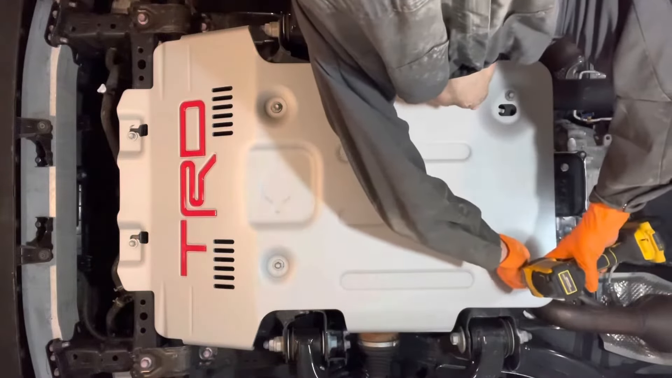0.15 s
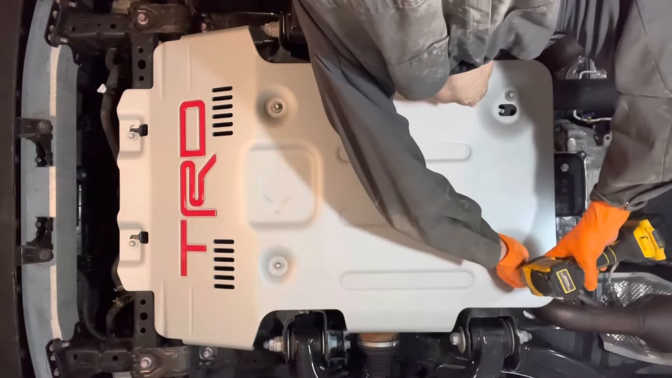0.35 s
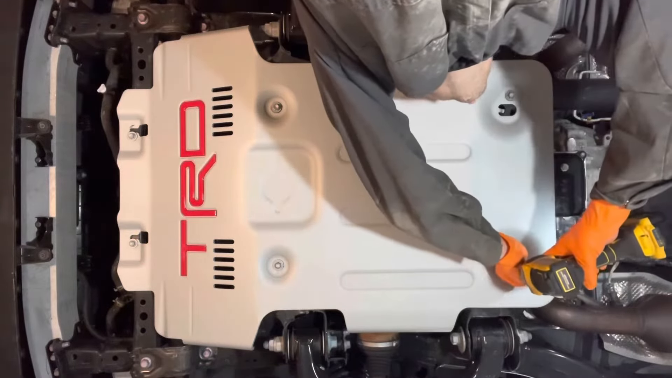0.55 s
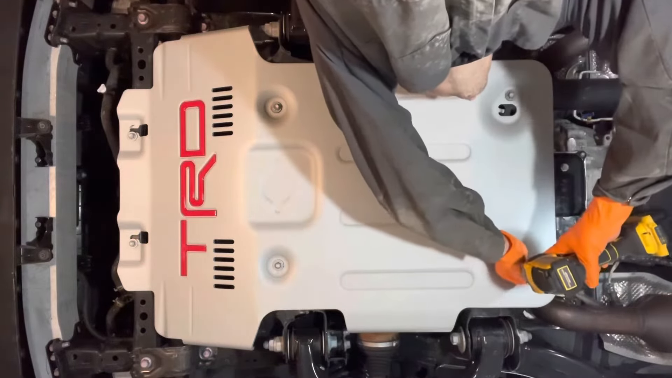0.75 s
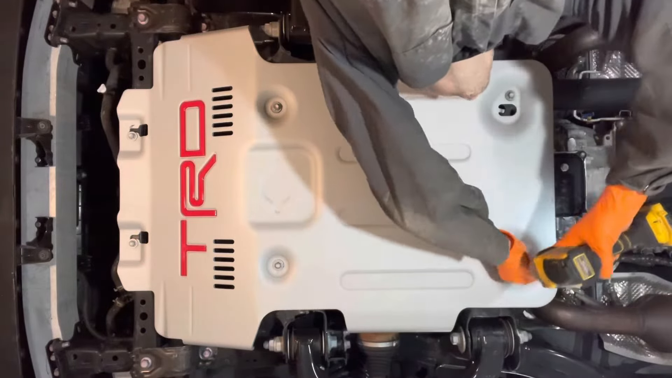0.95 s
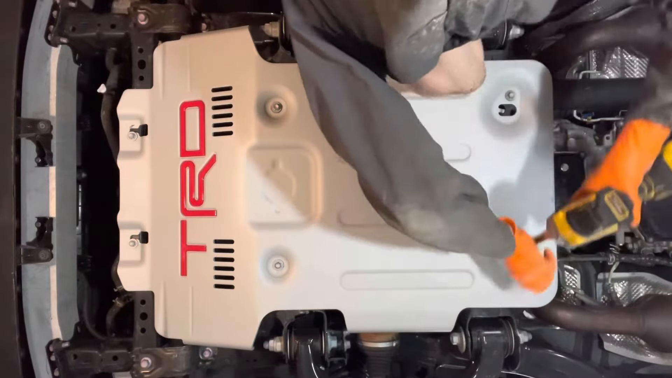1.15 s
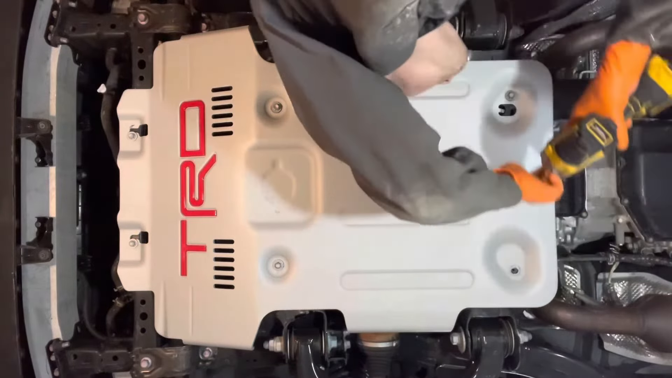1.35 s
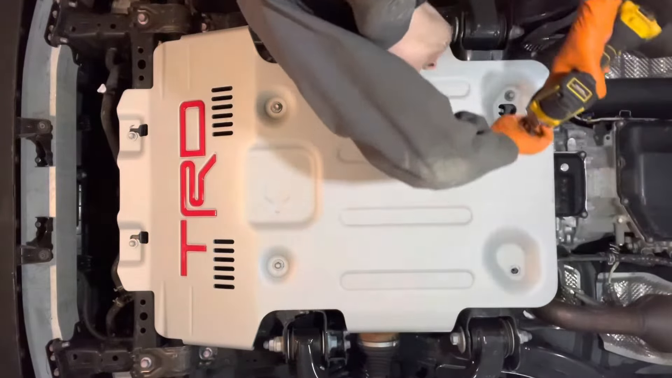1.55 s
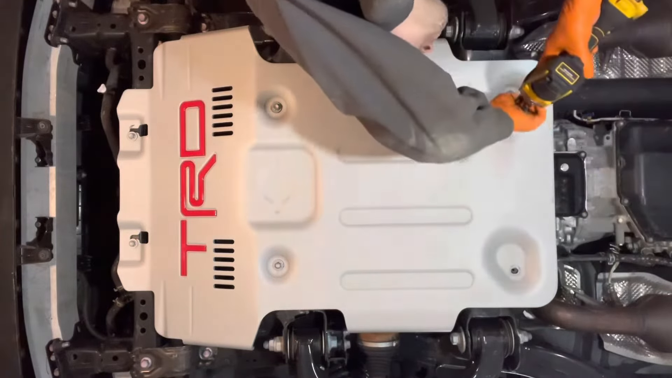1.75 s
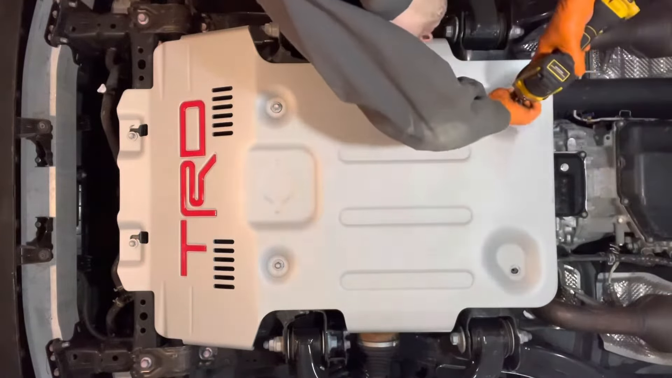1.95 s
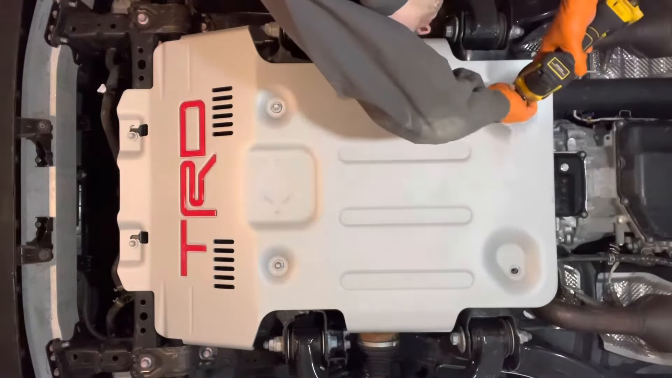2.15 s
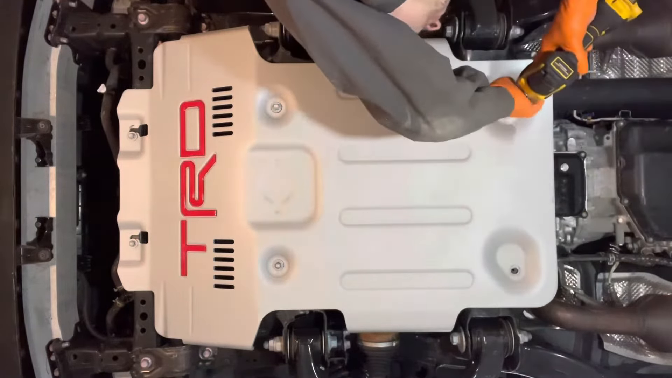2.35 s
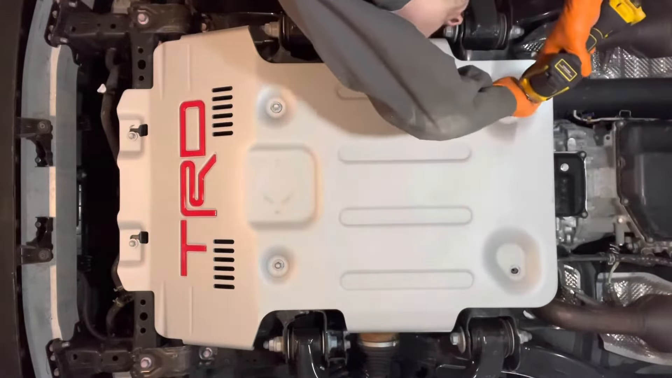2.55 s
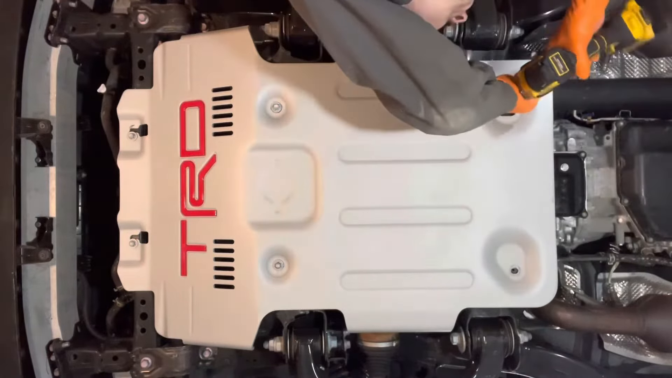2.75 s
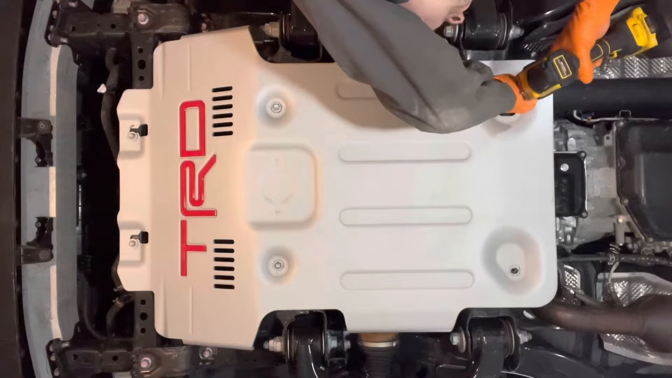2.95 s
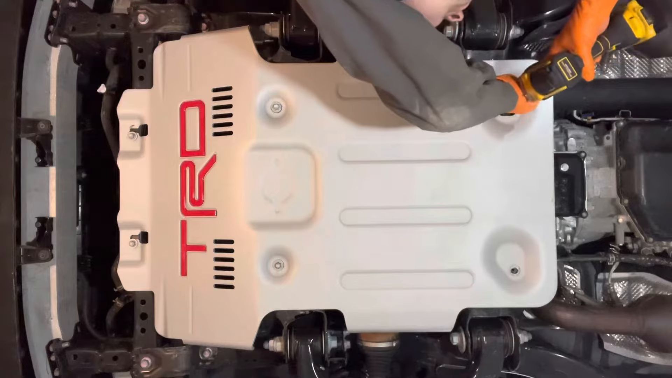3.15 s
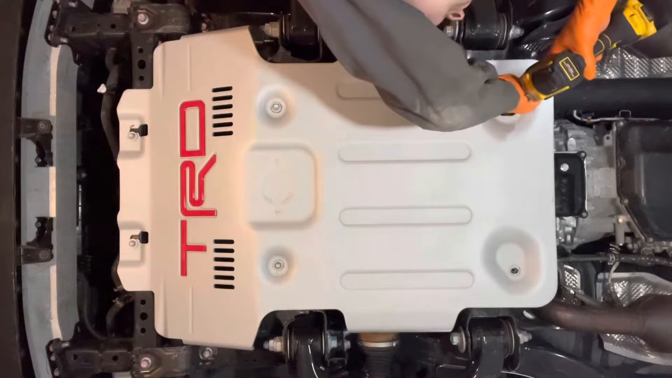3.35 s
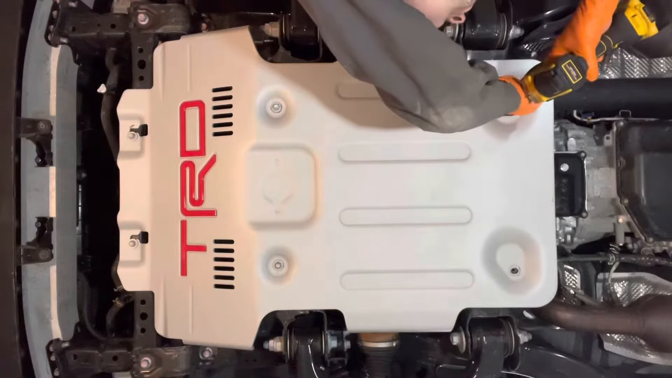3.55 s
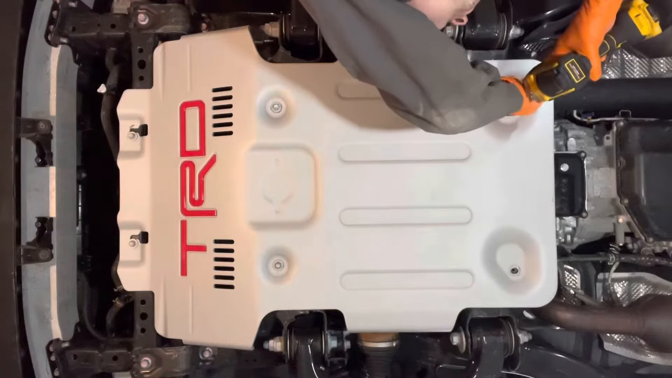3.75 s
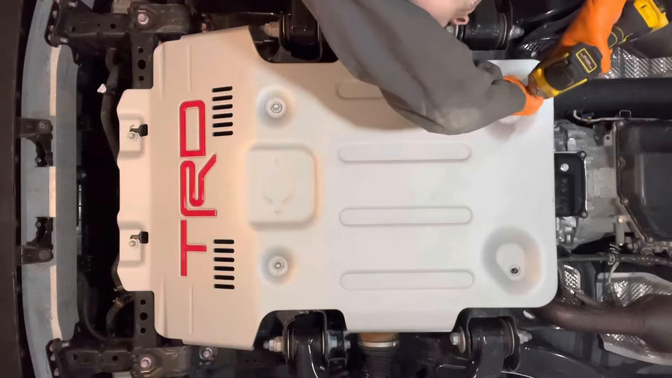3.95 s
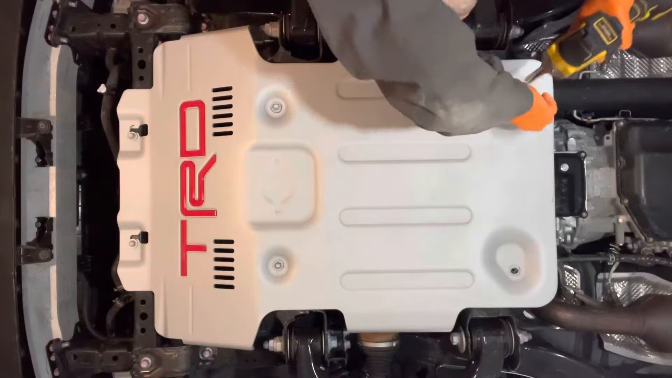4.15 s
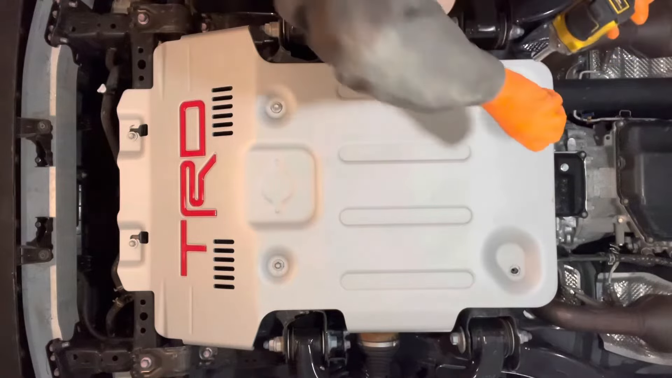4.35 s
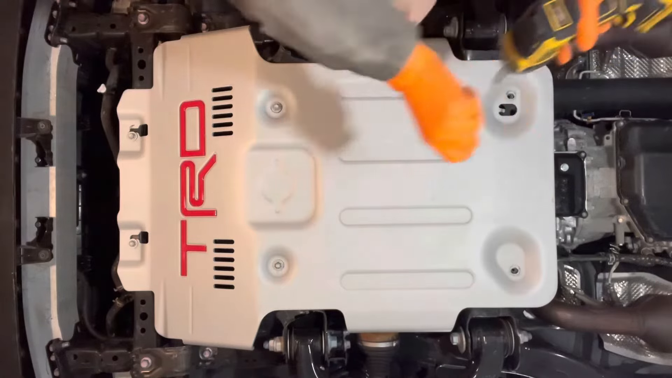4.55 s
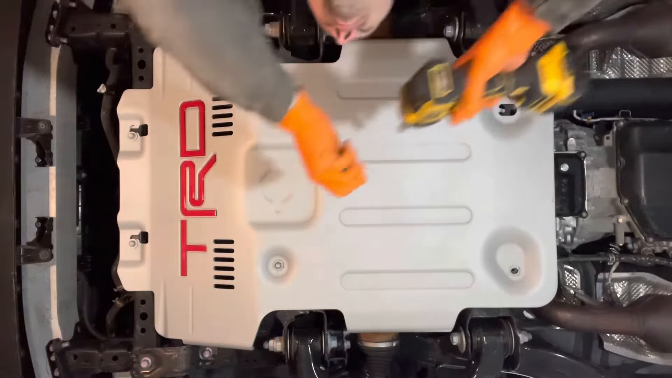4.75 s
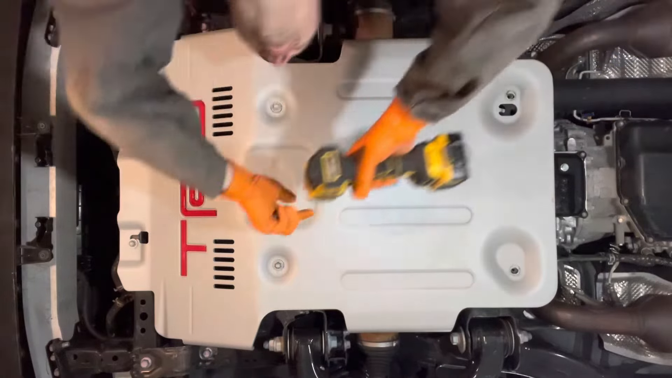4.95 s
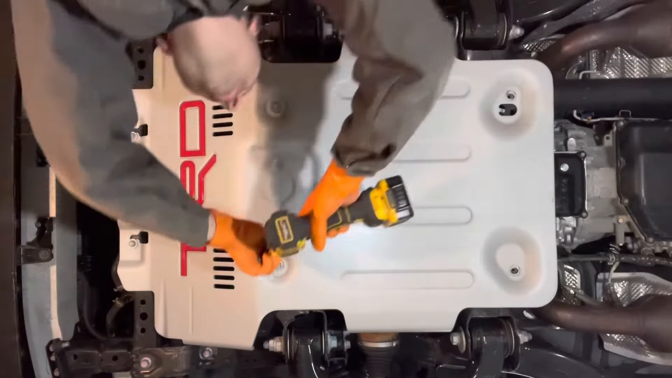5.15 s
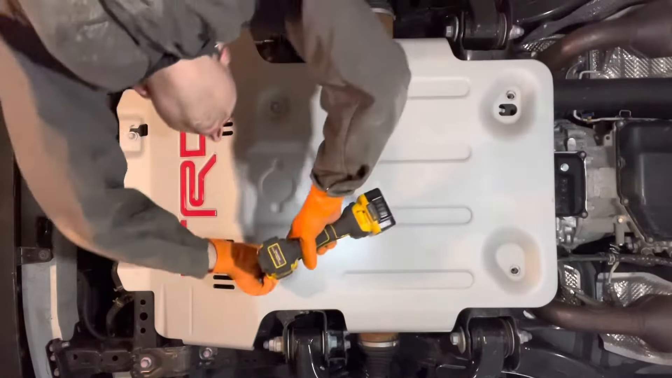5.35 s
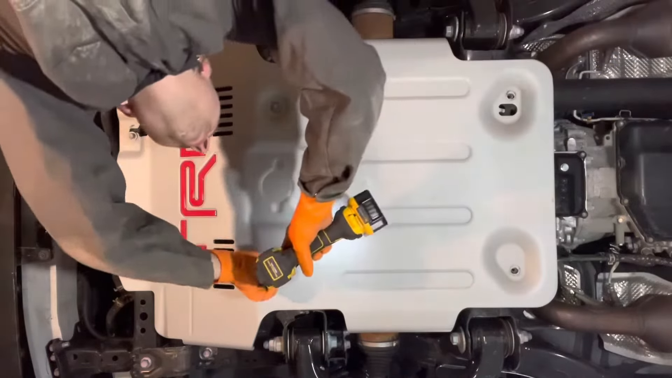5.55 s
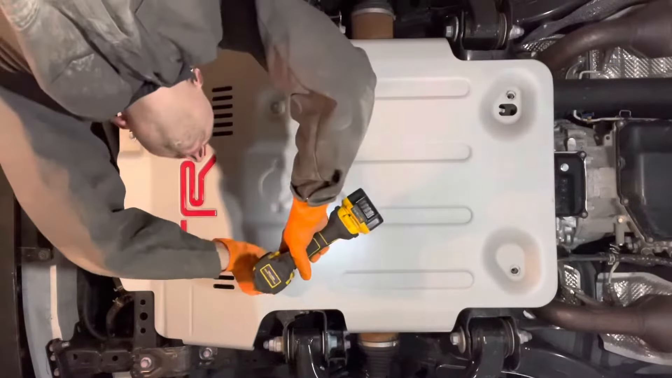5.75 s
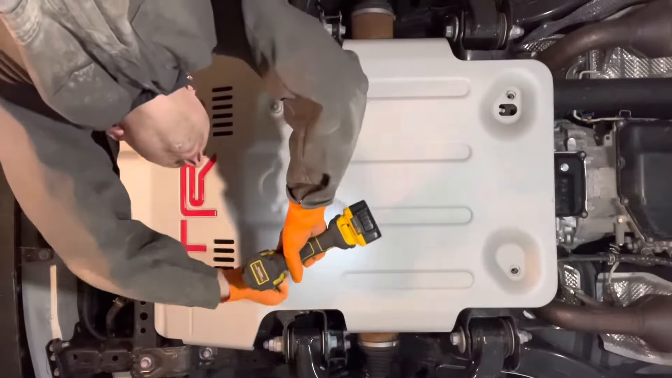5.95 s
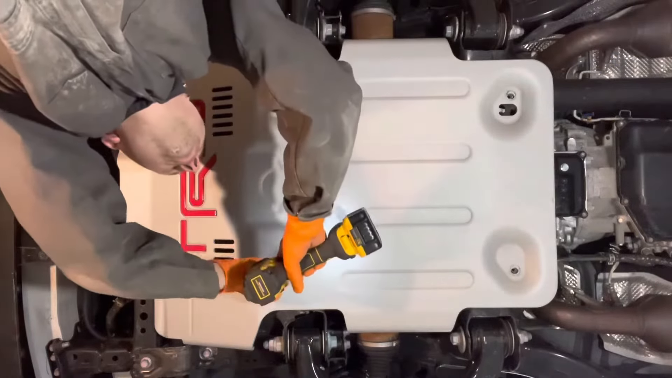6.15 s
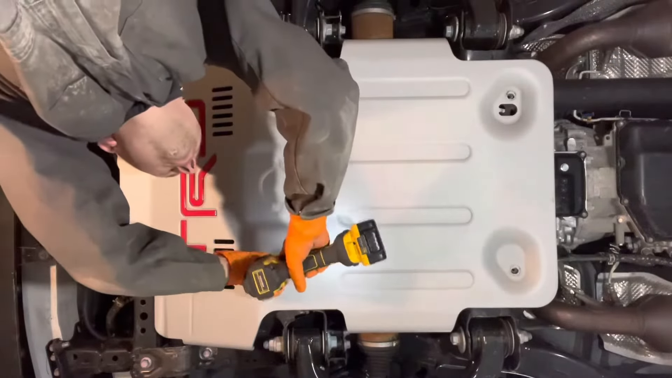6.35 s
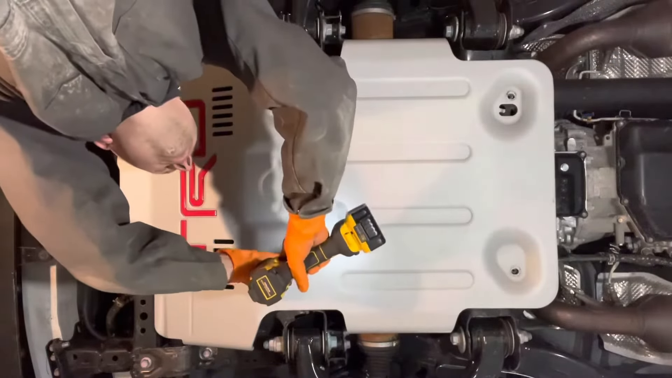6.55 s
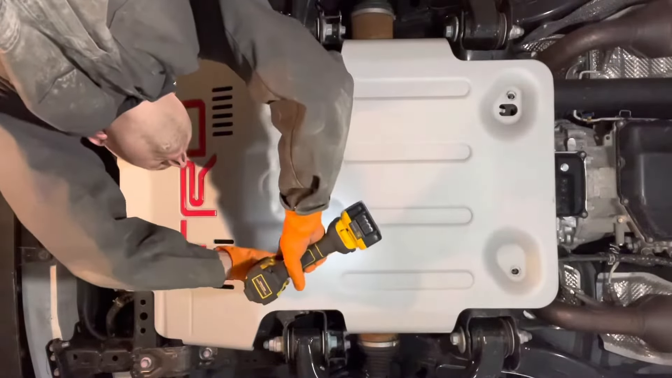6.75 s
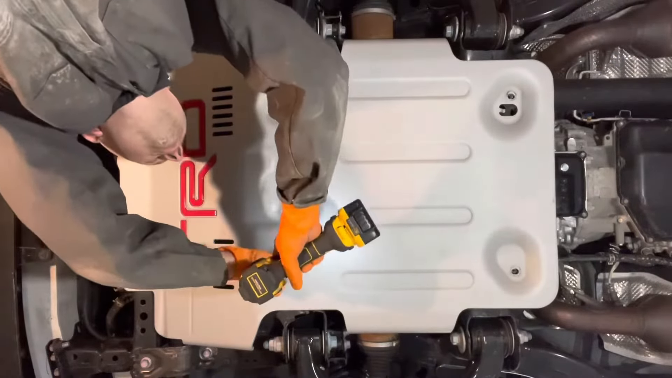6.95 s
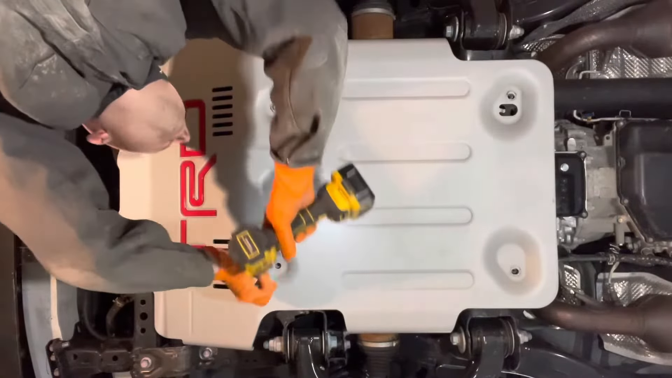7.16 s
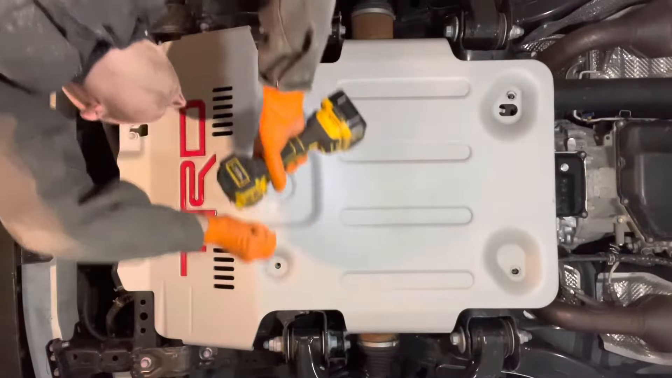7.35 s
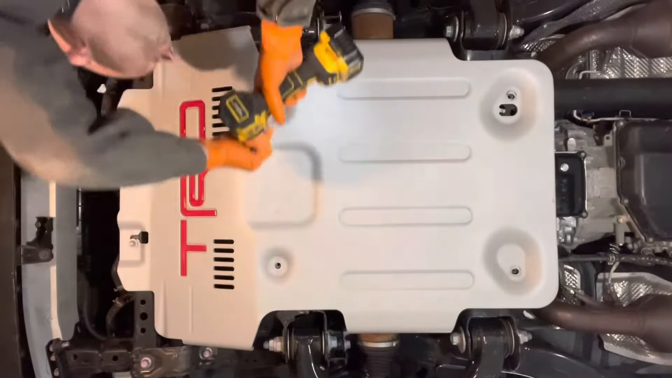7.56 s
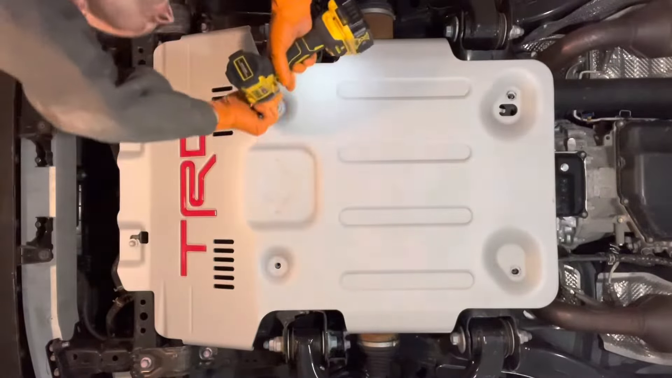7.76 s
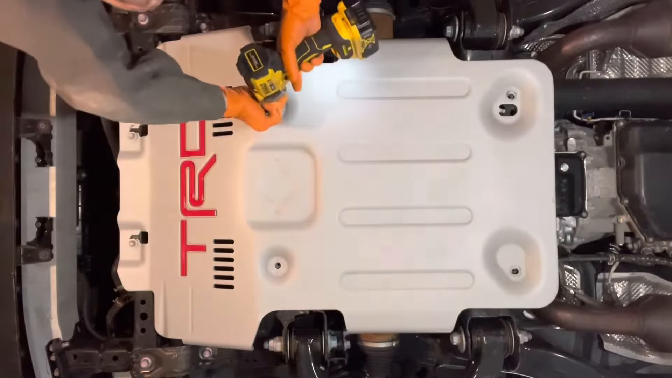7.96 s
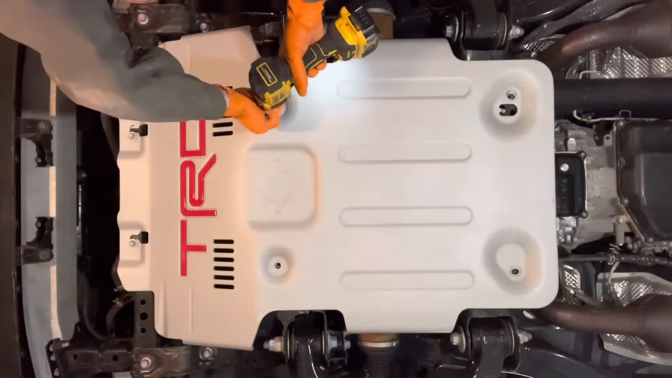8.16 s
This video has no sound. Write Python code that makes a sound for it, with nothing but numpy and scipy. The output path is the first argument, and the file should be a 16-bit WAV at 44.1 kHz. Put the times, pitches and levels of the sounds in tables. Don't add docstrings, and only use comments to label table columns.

```python
import sys
import numpy as np
from scipy import signal
from scipy.fft import rfft, irfft, next_fast_len
from scipy.io import wavfile
from scipy.ndimage import uniform_filter1d, map_coordinates

SR = 44100
rng = np.random.default_rng(int(sys.argv[2]) if len(sys.argv) > 2 else 0)


def magnitude_from_level(level_db):
    exponent = np.asarray(level_db, float) / 20
    return 10 ** exponent


def waveform_to_disk(signal):
    frames = np.transpose(np.atleast_2d(signal))
    scaled = np.clip(frames, -1, 1) * 32767
    samples = np.round(scaled).astype(np.int16)
    wavfile.write(sys.argv[1], SR, samples)


N = 361619
T = np.arange(N) / SR

# (time [s], gear mesh [Hz], load [dB], bite of the teeth [dB])
BURSTS = [
    [(0, 730, -33, -9), (.2, 775, -28.5, -6), (.315, 812, -29, -3), (.345, 970, -28.5, 4),
     (.39, 1003, -28, -4), (.43, 1130, -29.5, -3), (.49, 1169, -30.5, -2.5), (.72, 1182, -29.5, -0.5),
     (.8, 1152, -32, -11)],
    [(2.93, 270, -53, -1), (3.06, 342.7, -35, 6.5), (3.1, 436.8, -30.5, 4), (3.16, 435.7, -31.5, 1.5),
     (3.21, 520.7, -32.5, 3.5), (3.3, 640.5, -33.5, 1), (3.37, 711, -35.5, 1), (3.6, 729, -34, 3.5),
     (3.875, 735, -37.5, -10)],
    [(6.4, 979, -35.5, -11), (6.51, 995, -41.5, 0), (6.62, 1030, -30.5, -12.5), (6.7, 1035, -29.5, -3),
     (6.81, 1059, -33, 2.5), (6.83, 1120, -29.5, 5.5), (6.87, 1169, -34, 8.5), (6.945, 1140, -35.5, -15)],
]
# (frequency [Hz], width [Hz], level [dB])
HOUSINGS = [
    [(755, 1100, -3), (1550, 97, 1.5), (1063, 250, 8.5), (2060, 240, 1), (2214, 295, 8.5), (3050, 240, -26),
     (4100, 280, -2.5), (4710, 240, -5), (6550, 330, -6), (9340, 470, -16), (13600, 900, -10)],
    [(846, 180, -10), (1420, 340, -8), (2160, 340, -3.5), (2900, 61, -2.5), (4030, 570, -4.5),
     (5140, 280, -8), (6600, 320, -4.5), (9200, 1400, -15.5), (11500, 630, -17), (13220, 1000, -9.5)],
    [(814, 100, 2), (1020, 130, 4), (1540, 100, 0.5), (2080, 320, 4), (2750, 270, -2), (4090, 290, -1.5),
     (6670, 1000, -7), (9300, 1300, -9), (11800, 840, -15), (13240, 800, -9.5)],
]
# (level of each mesh order [dB], .., fan at top speed [dB])
VOICES = [
    (-8.5, -1.8, -6, -21, -27, -37, -3.5),
    (-15.5, -1.5, -8, -24.5, -32, -22.5, -5),
    (-14.5, -0.81, -26, -20.5, -32, -29, -4),
]
# (frequency [Hz], waver [Hz], level over load [dB])
SINGING = [
    [(4035, 111.4, -10), (6490, 59, -16), (2910, 49.7, -18), (4760, 115, -19)],
    [(4070, 49, -27), (6530, 130, -15), (6780, 110, -13.5), (2045, 45, -19), (2230, 130, -9),
     (2900, 39, -18)],
    [(3950, 73, -25), (6370, 33, -19.5), (7050, 90, -17.5), (2470, 40, -17)],
]
SING_DB_PER_OCTAVE = 53, 34, 22
MESH_ORDERS = 1, 2, 3, 4, 5, 7
ORDER_WAVER_DB = 4.5, 2, 3.5, 3.6, 3.6, 3.6
FAN_DB_PER_OCTAVE, TONES_IN_HOUSING = 7.5, 0.49
TONES_TOP_HZ, TONES_IN_ROOM_DB = 2760, -9.5
FLUTTER_DB, GLIDE_LOSS_DB = 2.5, 0.35
COAST_DB, COAST_T60 = -14, 0.52
BOLT_MODES_DB = 2.2

# (frequency [Hz], density [dB/Hz])
RUMBLE = [(20, -15), (45, -1.5), (70, 2), (120, -6.5), (250, -42)]
# (time [s], level [dB], width [s])
BUMPS = [
    (.22, 12.5, 0.23),
    (2.25, 7.5, 0.18),
    (2.85, 5.5, .1),
    (3.2, 5, 0.16),
    (4.86, 12.5, .06),
    (5.62, 4, .12),
    (8.05, 4.5, .2),
]
# (frequency [Hz], width [Hz], level [dB])
PLATE_LOW = [
    [(81.6, 7.4, -13), (112, 19, -9.5), (128.05, 4, 4)],
    [(176.5, 26, -2.5), (254, 10, -1.5), (298.2, 14, -2), (370, 21, -6.5)],
]
# (time [s], lowest modes [dB], rise [s], fall [s], next modes over them [dB])
SHAKES = [(.09, -40.5, 0.32, 0.41, 5.5), (.66, -36.5, 0.58, 0.29, 3), (1.3, -63.5, 1.4, 0.98, 1.5),
          (2.12, -42, 0.17, 0.24, 7), (2.811, -28.5, 0.031, 0.17, 6), (3.26, -37.5, 0.65, 0.11, 0),
          (3.36, -40, 0.34, 0.44, -8.5), (4.3, -70.5, 1.4, 2.6, 2.5), (4.932, -59, 0.12, 0.62, 6.5),
          (5.53, -49, 0.05, 0.52, 6), (6.299, -32, 0.029, 0.1, 3.5), (6.601, -24.5, 0.25, 0.16, -7),
          (6.759, -22.5, 0.33, 0.28, -14.5), (7.33, -48, 1.4, 2.5, -18)]
STILL_DB, NEXT_QUICKER = (-79, -73.5), 1.216

# (time [s], peak [dB], low part [dB])
TICKS = [(0.789, -37, -7), (1.048, -41, -12), (1.1453, -28.5, -32), (2.4782, -53, 0), (3.8601, -23, -22),
         (4.35, -26.5, -30), (4.543, -44, -6), (4.7224, -43, -25.5), (7.503, -32, -26), (7.66, -43.5, -16),
         (1.315, -60.5, 24), (5.014, -53, 10.5), (5.341, -48.5, -22)]
# (time [s], level [dB], rise [s], fall [s], brightness [dB])
MOVES = [(1.044, -55.5, 0.12, 1, -5), (1.6, -62, 1.3, 1, -32), (1.82, -66.5, 0.65, 0.093, -3.5),
         (2.48, -65, 0.028, 0.26, 1), (4.72, -70.5, 0.026, 0.059, 8.5), (2.25, -60, 0.095, 1, -14),
         (4.05, -63, 0.56, 0.83, -11.5), (4.374, -58.5, 0.33, 0.51, -6), (5.02, -53.5, 0.43, 0.3, -7.5),
         (5.25, -56, 0.14, 0.99, -13.5), (5.43, -66, 0.071, 0.26, 12.5), (5.88, -58.5, 0.18, 0.5, -3.5),
         (6.1, -64, 1.7, 0.88, -11), (7.1, -62, 0.15, 0.56, -23), (7.216, -47.5, 0.037, 0.22, 1.5),
         (7.31, -43, 0.126, 0.16, 1.5), (7.55, -59, 0.31, 0.33, -7)]
# (frequency [Hz], density [dB/Hz])
CLOTH = [(300, -5.5), (600, -10.5), (1500, -14), (3500, -20.5), (6000, -29), (10000, -30.5), (14000, -32),
         (16000, -38)]
HUSH_DB, MID_SHARE, MID_DB = (-79, -82, -85), 0.71, -2

# (time [s], peak [dB], thud [dB], crack [dB], hardness [dB/octave])
BLOWS = [(1.951, -12.5, -18.5, -48, -2), (2.039, -39, -7.5, -17, 10), (2.638, -34.5, -1.5, -29, -9.5),
         (2.735, -26.5, -20, -31, -3), (2.761, -19, -29, -34, -3), (2.773, -26, -29, -17, 7.5),
         (2.843, -20, -21, -20, 12.5), (2.85, -14, -21, -2.5, 6.5), (2.862, -19.5, -20.5, -4, 5.5),
         (3.886, -31.5, -24, -29, 3), (5.513, -10.5, -23.5, -30, 3), (5.527, -15, -20.5, -35.5, 0),
         (5.62, -33, -26, -32, 1.5), (5.574, -23.5, -29.5, -21.5, 8.5), (5.589, -18.5, -18.5, -28.5, -5.5),
         (5.687, -30, -36.5, -12.5, 4), (5.881, -41, -3.5, -24.5, 4), (5.943, -33, -16.5, -27, 6),
         (5.953, -26.5, -12, -30, -0.5), (5.963, -25.5, -16, -36.5, -5), (6.231, -30, -26, -21, 2.5),
         (6.249, -13.5, -5, -13.5, -0.5), (6.276, -15, -9.5, -29.5, 3.5), (6.288, -3, -11.5, -31, -1),
         (6.300, -11.5, -9.5, -32, -3.5), (6.312, -4, -24.5, -10.5, -5.5), (6.321, -9, -10.5, -20, 1),
         (6.343, -23.5, -15, -10.5, 5), (6.3669, -16.5, -35.5, -3, 7.5), (6.774, -44.5, -27, -10, 1),
         (6.923, -24, -30, -19, 3), (8.001, -14.5, -26.5, -50, 1.6), (8.014, -20.5, -27, -40, 2),
         (8.047, -28.5, -29, -34, 1), (8.075, -37, -33, -34, 2.5), (8.149, -23.5, -48, -10, 11.5),
         (8.155, -18, -51, -17.5, -2), (8.179, -21.5, -52, -29, 3)]
# (time [s], peak [dB], thud [dB], crack [dB], hardness [dB/octave])
KNOCKS = [
    (2.087, -17.5, -12, -51, -12.5),
    (2.801, -10.5, -29, -37, -15),
    (2.802, -11, -5, -38, 2.5),
    (2.807, -13, -14, -38.5, 2),
    (2.836, -17, -4.5, -33, -16),
    (6.262, -15.5, 5, -44, 2),
    (5.014, -57.5, 4, -27, -30),
    (7.304, -42.5, 10.5, -15.5, -15.5),
    (7.997, -17, -16, -39, -1),
]
# (frequency [Hz], level [dB], t60 [s])
PLATES = [
    [(707.4, -11, 0.64), (1083, -5.5, 0.092), (1280, -29, 0.17), (1765, -10.5, 0.047), (1911, -4, 1.1),
     (2040, -10, 0.19), (2380, -29, 0.054), (2840, -15.5, 0.22), (3480, -40, 0.49)],
    [(708, -2.5, 0.095), (593.4, -8, 0.064), (1014, -7, 0.29), (1166, -3, .13), (2367, -9.5, 0.27),
     (4360, -10.5, 0.06), (1572, -24, 0.039), (1770, -17.5, 0.24), (2097, -15.5, 0.054), (2890, -18, .2),
     (3730, -12.5, 0.028)],
    [(716, -9.5, 0.4), (985.6, -1.5, 0.22), (1066, -1.5, 0.16), (1557, -6, 0.23), (2173, -1.5, 0.14),
     (2470, -4.5, 0.071), (2790, -16.5, 0.18), (3430, -13, 0.23), (3200, -13, 0.058), (3890, -19, 0.11),
     (4420, -40, 0.1)],
    [(854, -6.5, 0.12), (1270, -4, 0.11), (1547, -8, .2), (1807, -8, .1), (1870, -6.5, 0.24),
     (2180, -6.5, 0.14), (2326, -8.5, .15), (3490, -11.5, 0.096), (3940, -10.5, 0.094), (4570, -20, 0.17)],
    [(729, -7.5, 0.16), (1040, -8, 0.22), (1140, 3, 0.16), (1550, -2, 0.2), (1236, -39, 0.25),
     (1778, -0.5, 0.12), (1830, -11, 0.2), (1930, 1, 0.15), (2620, -33, 0.45), (2900, -42, 5.0),
     (3630, -13.5, 0.18), (4260, -40, 0.21)],
]
# (frequency [Hz], density [dB/Hz])
SHEET = [(300, -44), (600, -3), (1100, 8), (2200, 1.5), (3500, -12.5), (5000, -19), (9000, -42)]
# (frequency [Hz], t60 [s])
SHEET_T60 = [(150, 0.26), (400, 0.29), (1000, 0.12), (3000, 0.26), (8000, 0.2)]
# (frequency [Hz], width [Hz], level [dB])
SOCKET = [(4370, 1400, 8), (8290, 840, 3.5), (11600, 1800, 0), (15500, 1500, -3.5)]
BLOW_CHATTER_S, KNOCK_CHATTER_S = 0.011, 0.0049
BLOW_ATTACK_S = 0.0014
LEAD_IN_S, LEAD_IN_DB, KNOCK_LEAD_IN_DB = 0.015, -16.5, -31
LONGEST_T60, SPLIT = 0.21, 0.012

# (time [s], groan [dB])
STRAIN = [
    (2.626, -57.5),
    (2.8, -24.5),
]
SQUEAK_DB, SQUEAK_GROWS = -40, 0.58
HISS_DB, HISS_GROWS = -56.5, 0.37
# (time [s], peak [dB])
SNAPS = [
    (2.8526, -9.5),
    (6.2485, -12.5),
    (6.3108, -3),
    (6.3682, -7.5),
]
# (frequency [Hz], width [Hz], level [dB])
ANVIL = [(4500, 900, -7), (8600, 1200, 1.5), (12700, 2900, -0.5), (16000, 1500, -4.5)]
LATE_RING = 3.5, 254.5, -60.5, 14.5
PLATE_HUM = 6, 181, -45, 1
# (frequency [Hz], level [dB], t60 [s])
AFTER_RING = [(51.3, -61, 7.8), (106, -34.5, 3.2), (130, -40.5, 6.1), (174, -48, 4.4), (376, -64, 3.06)]

# (frequency [Hz], t60 [s])
GARAGE = [(150, 0.87), (1000, 0.6), (4000, 0.53), (12000, 0.18)]
# (frequency [Hz], left-right likeness [0-1])
ALIKE = [(40, 0.78), (150, 1), (320, 0.71), (1000, 0.77), (2500, 0.94), (5000, 0.043), (7000, 0.51),
         (15000, 0.42)]
# (frequency [Hz], left lead [rad])
LEAD = [(120, 0.11), (1100, -1.49), (4100, -1.2), (6600, -0.036), (14000, 1)]
# (time [s], left over right [dB])
PAN = [
    (0, -1.5),
    (1.2, 1),
    (1.5, 0.5),
    (2.2, -0.5),
    (3, -1.6),
    (4.2, -0.5),
    (5.2, 2),
    (5.6, -1.3),
    (6.7, -0.5),
    (8.2, 0.5),
]


def unit(x):
    return x / np.sqrt(np.mean(x ** 2) + 1e-20)


def along(points, hz):
    f, v = np.transpose(points)
    return np.interp(np.log(hz + 1), np.log(f + 1), v)


def curves(rows):
    s, *cols = np.transpose(rows)
    return [np.interp(T, s, c) for c in cols]


def gate(rows, fade):
    opening = np.clip((T - rows[0][0]) / fade + 1, 0, 1)
    closing = np.clip((rows[-1][0] - T) / fade + 1, 0, 1)
    return opening * closing


def wobble(rate):
    t = T[::16]
    knots = rng.standard_normal(int(N * rate / SR) + 4)
    return np.interp(T, t, map_coordinates(knots, [t * rate]))


def filtered(x, response):
    n = x.shape[-1]
    m = next_fast_len(n + 8192)
    return irfft(rfft(x, m) * response(np.fft.rfftfreq(m, 1 / SR)), m)[..., :n]


def band(f, lo_hz, hi_hz):
    return 1 / np.sqrt((1 + (lo_hz / (f + 1)) ** 8) * (1 + (f / hi_hz) ** 8))


def resonances(peaks, f):
    return np.sqrt(sum(magnitude_from_level(2 * db) / (1 + ((f * f - c * c) / (f * w + 1)) ** 2) for c, w, db in peaks))


def dying(t60s, seconds):
    hz, t, z = signal.stft(rng.standard_normal((2, int(seconds * SR))), SR, nperseg=256)
    return signal.istft(z * magnitude_from_level(-60 * t / along(t60s, hz)[:, None]), SR, nperseg=256)[1]


def patchy(patchy_db):
    z = signal.stft(rng.standard_normal((2, N)), nperseg=512)[2]
    field = uniform_filter1d(rng.standard_normal(z.shape[1:]), size=3, axis=0)
    field = uniform_filter1d(field, size=8, axis=1)
    return signal.istft(z * magnitude_from_level(patchy_db * unit(field)), nperseg=512)[1][:, :N]


def crowded(depth_db, spacing_hz):
    knots = rng.standard_normal((2, int(SR / 2 / spacing_hz) + 4))

    def response(f):
        peaks = np.array([map_coordinates(k, [f / spacing_hz]) for k in knots])
        return magnitude_from_level(depth_db * peaks - depth_db ** 2 / 9)
    return response


def swells(rows, over_db, quicker, rest_db):
    t = T[::64]
    power = magnitude_from_level(2 * rest_db)
    for (s, db, rise, fall, _), more_db in zip(rows, over_db):
        away = np.where(t < s, (s - t) / max(rise, .01), (t - s) / max(fall, .01))
        power = power + magnitude_from_level(2 * (db + more_db - 20 * quicker * away))
    return np.interp(T, t, np.sqrt(power))


def ports(pair):
    def mid_side(f):
        turn = np.arccos(np.clip(along(ALIKE, f), -1, 1)) / 2
        return np.array([np.cos(turn), np.sin(turn)])

    def lead(f):
        return np.exp(.5j * along(LEAD, f) * np.array([[1], [-1]]))
    mid, side = filtered(pair, mid_side)
    return filtered(np.array([mid + side, mid - side]), lead)


def whine(mesh_hz, load_db, bite_db, phase, tones_db, housing):
    slip_db = GLIDE_LOSS_DB * uniform_filter1d(np.abs(np.gradient(np.log2(mesh_hz))) * SR, size=400)
    tones = np.zeros((2, N))
    for order, db, waver_db in zip(MESH_ORDERS, tones_db, ORDER_WAVER_DB):
        hz = order * mesh_hz
        colour = np.repeat(resonances(housing, hz[::64]), 64)[:N] ** TONES_IN_HOUSING
        colour = colour * band(hz, 1, TONES_TOP_HZ) ** 5
        waver = waver_db * np.array([wobble(30), wobble(30)]) + FLUTTER_DB * wobble(90)
        level = magnitude_from_level(load_db + bite_db + db + waver - slip_db)
        tones += np.sqrt(2) * level * colour * np.sin(order * phase + [[0], [1.9 * order]])
    return tones


def housing_modes(modes, speed_octaves, wake_db):
    sing = np.zeros((2, N))
    for hz, width, db in modes:
        phase = 2 * np.pi * np.cumsum(hz + width / 2 * wobble(50)) / SR
        sing += np.sqrt(2) * magnitude_from_level(db + 2.1 * wobble(25)) * np.sin(phase + [[0], [1.4]])
    return magnitude_from_level(wake_db * speed_octaves) * sing


def driver():
    roar, clear = np.zeros((2, 2, N))
    air, grind = patchy(patchy_db=5.0), patchy(patchy_db=3.5)
    settings = zip(BURSTS, VOICES, HOUSINGS, SINGING, SING_DB_PER_OCTAVE)
    for rows, (*tones_db, fan_db), housing, modes, wake_db in settings:
        mesh_hz, load_db, bite_db = curves(rows)
        speed_octaves = np.log2(mesh_hz / mesh_hz.max())
        phase = 2 * np.pi * np.cumsum(mesh_hz * (1 + 0.0033 * wobble(60))) / SR
        tones = whine(mesh_hz, load_db, bite_db, phase, tones_db, housing)
        sing = magnitude_from_level(load_db) * housing_modes(modes, speed_octaves, wake_db)
        clear += gate(rows, 0.0074) * (tones + sing)

        teeth = (1 + .5 * np.cos(phase)) * magnitude_from_level(1.3 * wobble(40) + 0.44 * wobble(300))
        gears = unit(filtered(teeth * grind, lambda f: resonances(housing, f) * band(f, 430, 3300)))

        def fan_colour(f):
            notch = 1 - 0.59 * np.exp(-((f - 8200) / 600) ** 2)
            return resonances(housing, f) ** 0.92 * band(f, 3200, 13700) ** 2 * notch
        fan = unit(filtered(teeth * air, fan_colour))
        noise = magnitude_from_level(-3.0) * gears + magnitude_from_level(fan_db + FAN_DB_PER_OCTAVE * speed_octaves) * fan
        end = rows[-1][0]
        coast = (T > end) * magnitude_from_level(COAST_DB - 60 * np.abs(T - end) / COAST_T60)
        noise = (gate(rows, 0.0066) + coast) * magnitude_from_level(load_db) * noise
        roar += filtered(noise, crowded(depth_db=BOLT_MODES_DB, spacing_hz=40.9))
    return roar, clear


def plate_gains():
    above_db = np.transpose(SHAKES)[-1]
    lowest = swells(SHAKES, 0 * above_db, 1, STILL_DB[0])
    return lowest, swells(SHAKES, above_db, NEXT_QUICKER, STILL_DB[1])


def rumble():
    bumps_db = sum(db * np.exp(-((T - s) / width) ** 2) for s, db, width in BUMPS)
    noise = unit(filtered(rng.standard_normal((2, N)), lambda f: magnitude_from_level(along(RUMBLE, f))))
    return plate_gains()[0] ** 0.32 * magnitude_from_level(-44 + 2.9 * wobble(6) + bumps_db) * noise


def boom():
    out = np.zeros((2, N))
    for gain, modes in zip(plate_gains(), PLATE_LOW):
        noise = rng.standard_normal((2, N))
        out += gain * magnitude_from_level(-0.5) * unit(filtered(noise, lambda f: resonances(modes, f) * band(f, 50, 390)))
    return out


def ticks():
    out, t = np.zeros((2, N + SR)), np.arange(4096) / SR
    for s, db, low_db in TICKS:
        click = magnitude_from_level(-60 * t / 0.028) * rng.standard_normal((2, len(t)))
        click = filtered(click, lambda f: band(f, 3800, 16000))
        tap = magnitude_from_level(-60 * t / 0.036) * rng.standard_normal((2, len(t)))
        tap = filtered(tap, lambda f: band(f, 270, 1300))
        out[:, round(s * SR):][:, :len(t)] += magnitude_from_level(db - 7.0) * (click + magnitude_from_level(low_db + 14) * tap)
    return out[:, :N]


def rustle():
    bright_db = np.transpose(MOVES)[-1]
    noise = magnitude_from_level(0.72 * wobble(250) + 1.3 * wobble(25)) * patchy(patchy_db=2.8)
    edges_hz = [(300, 1500), (1500, 5000), (5000, 16500)]
    overs_db = 0 * bright_db, MID_DB + MID_SHARE * bright_db, bright_db
    out = np.zeros((2, N))
    for over_db, rest_db, edge in zip(overs_db, HUSH_DB, edges_hz):
        part = unit(filtered(noise, lambda f: magnitude_from_level(along(CLOTH, f)) * band(f, *edge)))
        out += swells(MOVES, over_db, 1, rest_db) * part
    return out


def contact_train(chatter, lead_db, lead):
    t = np.arange(2048) / SR
    contacts = rng.standard_normal(2048) ** 3 * np.exp(-(t / max(chatter, .001)) ** 2)
    contacts = contacts * (rng.random(2048) < .03)
    contacts[0] = 11
    graze = magnitude_from_level(lead_db) * rng.standard_normal(lead) * np.arange(lead) / lead
    contacts = np.r_[graze, contacts]
    return contacts / np.linalg.norm(contacts)


def struck_modes(plate, t):
    ring = np.zeros((2, len(t)))
    for hz, level, t60 in plate:
        cluster_hz = hz * (1 + SPLIT * rng.standard_normal(3))
        cluster = np.sin(2 * np.pi * np.outer(cluster_hz, t)).sum(0) / np.sqrt(3)
        ring += magnitude_from_level(level + rng.normal(0, 2.0, (2, 1)) - 60 * t / min(t60, LONGEST_T60)) * cluster
    return ring


def blows():
    out, t = np.zeros((2, N + SR)), np.arange(SR // 2) / SR
    lead = round(LEAD_IN_S * SR)
    rows = [row + (BLOW_CHATTER_S, LEAD_IN_DB) for row in BLOWS]
    rows += [row + (KNOCK_CHATTER_S, KNOCK_LEAD_IN_DB) for row in KNOCKS]
    for s, db, thud_db, crack_db, hardness_db, chatter, lead_db in rows:
        tail, modes = dying(SHEET_T60, .51)[:, :len(t)], crowded(depth_db=2.0, spacing_hz=49.7)
        plate = PLATES[np.searchsorted([2.5, 4.5, 6.1, 7.6], s)]
        low_hz = 620 * 2 ** (min(hardness_db, 0) / 9)
        sheet = filtered(tail, lambda f: modes(f) * magnitude_from_level(along(SHEET, f)) * band(f, low_hz, 11000))
        bright = filtered(0.9 * struck_modes(plate, t) + 2.55 * sheet,
                          lambda f: magnitude_from_level(hardness_db * np.log2(np.clip(f, 400, 6000) / 1200)))
        thud_modes = [(178, 32, -0.5), (283, 44, 8.0), (420, 130, -15.0)]
        thud = magnitude_from_level(thud_db + 17.5) * filtered(tail, lambda f: resonances(thud_modes, f))
        burst = tail * (0.34 + 1.3 * magnitude_from_level(-60 * t / 0.021)) * (1 - np.exp(-t / 0.00072))
        crack = filtered(burst, lambda f: band(f, 3600, 22000) * resonances(SOCKET, f))
        answer = (bright + thud) * (1 - np.exp(-(t / BLOW_ATTACK_S) ** 2))
        contacts = contact_train(chatter, lead_db, lead)
        body = signal.fftconvolve(answer, contacts[None], axes=1)[:, :len(t)]
        out[:, round(s * SR) - lead:][:, :len(t)] += magnitude_from_level(db - 10) * body
        out[:, round(s * SR):][:, :len(t)] += magnitude_from_level(db - 7.5) * magnitude_from_level(crack_db + 9.0) * crack
    return out[:, :N]


def strain():
    groan_db, = curves(STRAIN)
    growth_db = groan_db - groan_db.max()
    slips = 1 + 0.55 * np.cos(2 * np.pi * np.cumsum(95 + 25 * wobble(30)) / SR)
    noise = rng.standard_normal((2, N))
    motor = [(650, 360, -3.0), (1070, 230, 16.5), (2000, 820, -8.5)]
    groan = unit(filtered(noise, lambda f: resonances(motor, f) * band(f, 350, 3200)))
    squeak = unit(filtered(noise * slips ** 2, lambda f: resonances([(4220, 370, 0)], f) ** 2))
    hiss = unit(filtered(noise * np.sqrt(np.abs(slips)), lambda f: band(f, 5000, 12000)))
    out = magnitude_from_level(groan_db) * groan
    out += magnitude_from_level(SQUEAK_DB + SQUEAK_GROWS * growth_db) * squeak
    out += magnitude_from_level(HISS_DB + HISS_GROWS * growth_db) * hiss
    return gate(STRAIN, 0.0089) * out


def snaps():
    out, t = np.zeros((2, N)), np.arange(1024) / SR
    for s, db in SNAPS:
        puff = rng.standard_normal((2, len(t))) * magnitude_from_level(-60 * t / 0.012) * (1 - np.exp(-t / 0.00026))
        out[:, round(s * SR):][:, :len(t)] += magnitude_from_level(db + 4) * filtered(puff, lambda f: resonances(ANVIL, f))
    return out


def single_mode(row, waver_db, rate):
    start, hz, db, t60 = row
    since = np.clip(T - start, 0, None)
    return magnitude_from_level(db - 60 * since / t60 + waver_db * wobble(rate)) * np.sin(2 * np.pi * hz * since)


def ringing():
    late = single_mode(LATE_RING, 2.1, 11) * np.clip((4.55 - T) / 0.073, 0, 1)
    hum = single_mode(PLATE_HUM, 2.5, 24)
    since = np.clip(T - 6.87, 0, None)
    ring = sum(magnitude_from_level(db - 60 * since / t60) * np.sin(2 * np.pi * hz * since) for hz, db, t60 in AFTER_RING)
    ring = ring * (1 - np.exp(-since / 0.022))
    return (late + hum) * [[1], [0]] + ring * [[1], [.1]]


def garage(x):
    tail = ports(dying(GARAGE, .7))
    delayed = np.pad(x, ((0, 0), (300, 0)))
    return signal.fftconvolve(delayed, tail / np.linalg.norm(tail[0]), axes=1)[:, :N]


def scene():
    roar, clear = driver()
    tool = roar + strain()
    knocks = blows() + ticks() + snaps()
    plate = rumble() + boom() + ringing()
    near = ports(tool + clear + knocks + plate + rustle())
    pan_db, = curves(PAN)
    direct = near * magnitude_from_level(np.array([pan_db, -pan_db]) / 2)
    return direct + garage(magnitude_from_level(-8.0) * tool + magnitude_from_level(TONES_IN_ROOM_DB) * clear + magnitude_from_level(-9.5) * knocks)


def band_limit(x):
    return signal.sosfilt(signal.butter(12, 16790, fs=SR, output="sos"), x)


def record(dry):
    x = filtered(dry, lambda f: band(f, 27, 15800) ** 2 * (f < 16500))
    x = x / (1 + np.abs(x / .95) ** 5) ** (1 / 5)
    return band_limit(x)


dry = scene()
out = record(dry)
waveform_to_disk(out)
```